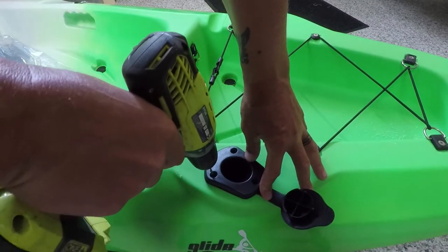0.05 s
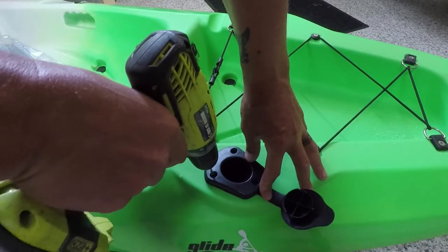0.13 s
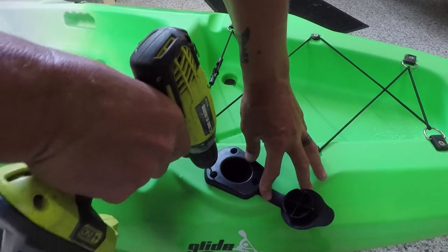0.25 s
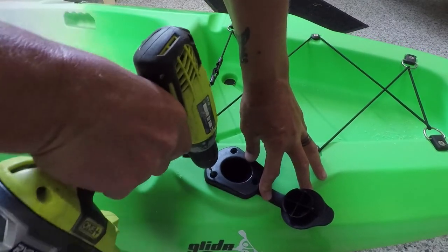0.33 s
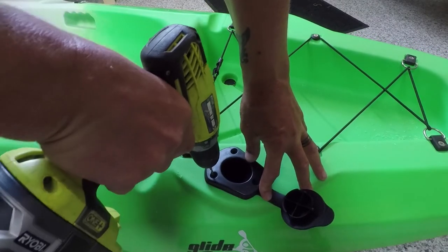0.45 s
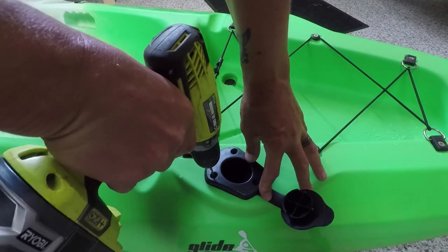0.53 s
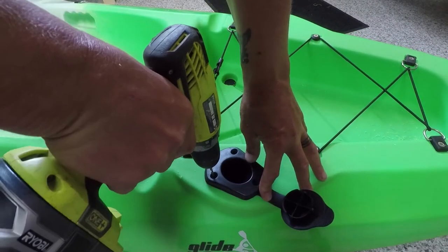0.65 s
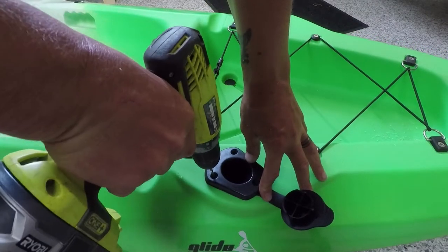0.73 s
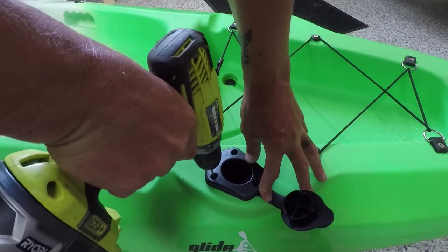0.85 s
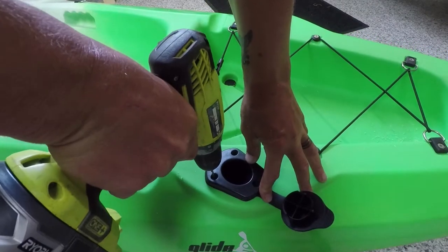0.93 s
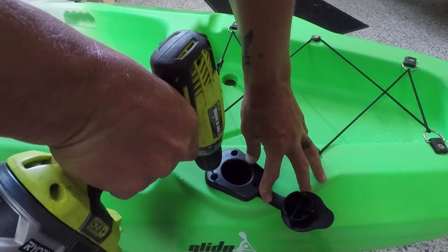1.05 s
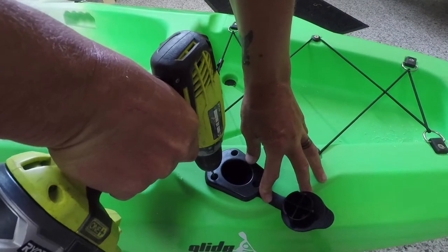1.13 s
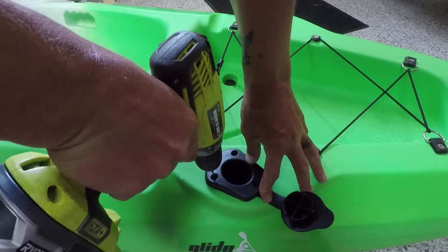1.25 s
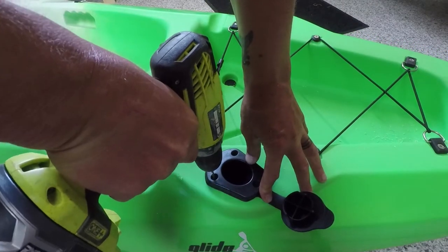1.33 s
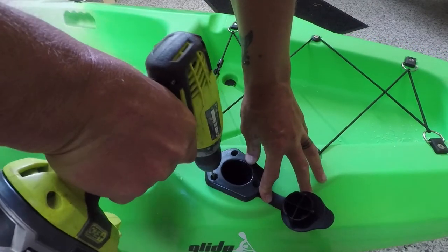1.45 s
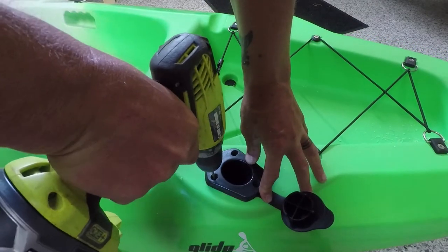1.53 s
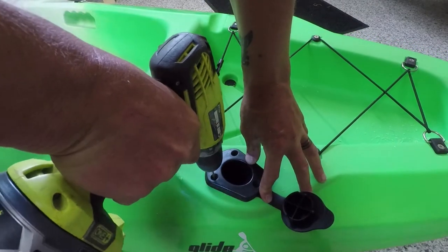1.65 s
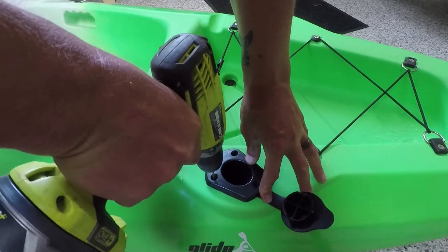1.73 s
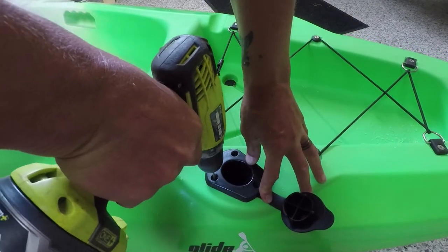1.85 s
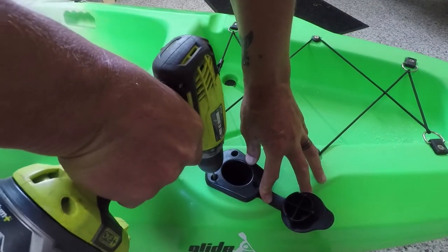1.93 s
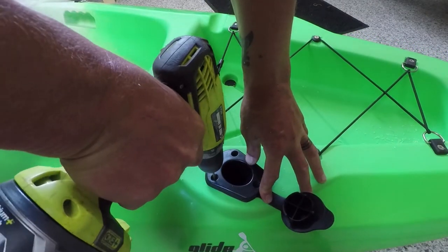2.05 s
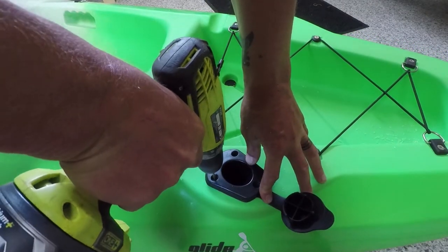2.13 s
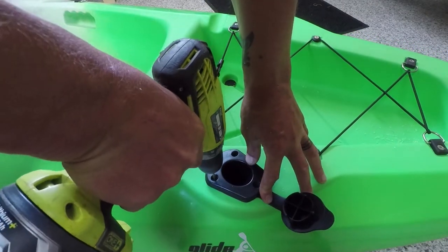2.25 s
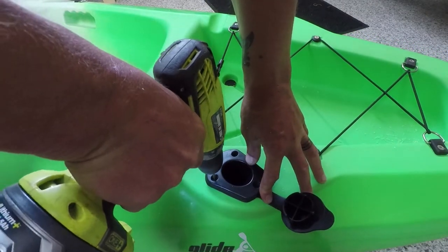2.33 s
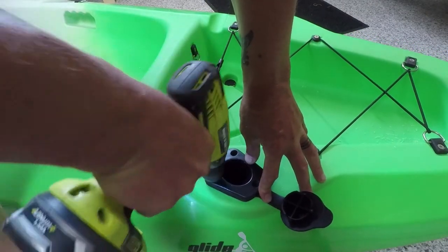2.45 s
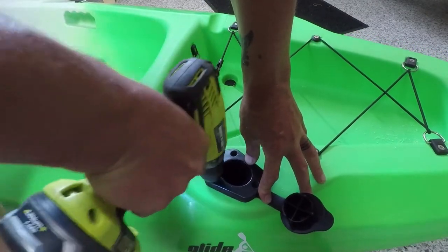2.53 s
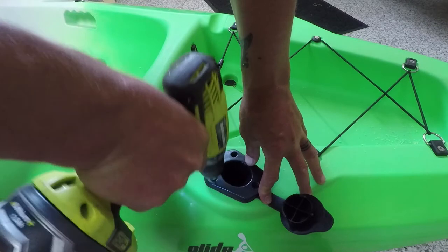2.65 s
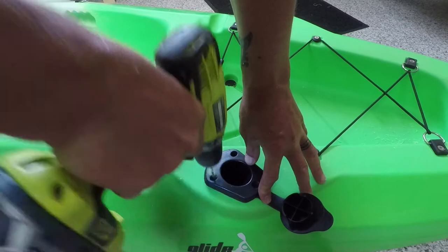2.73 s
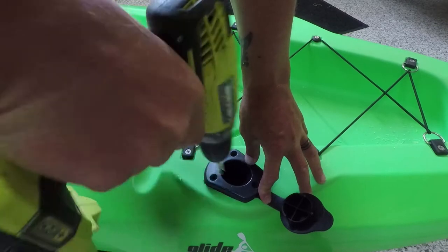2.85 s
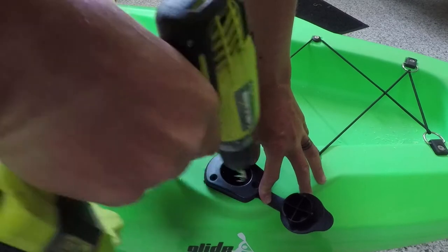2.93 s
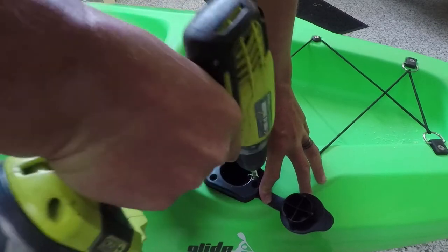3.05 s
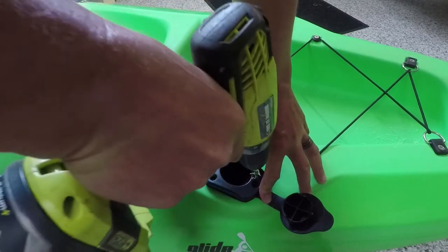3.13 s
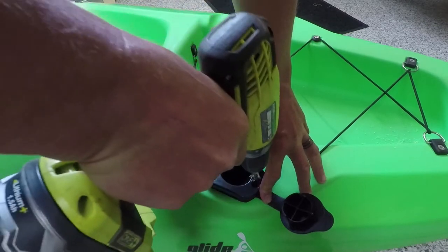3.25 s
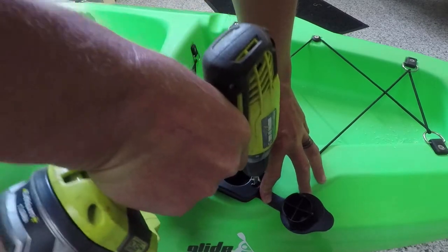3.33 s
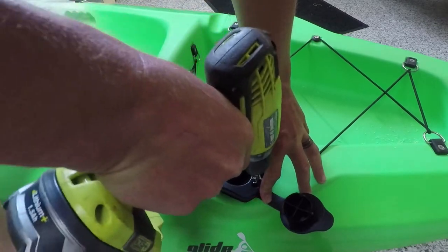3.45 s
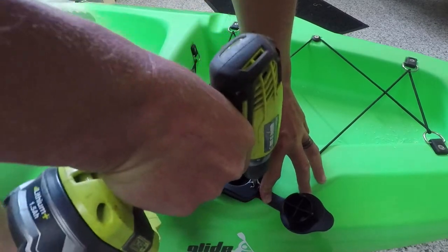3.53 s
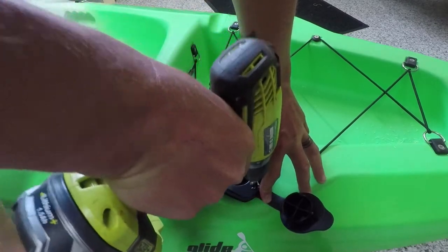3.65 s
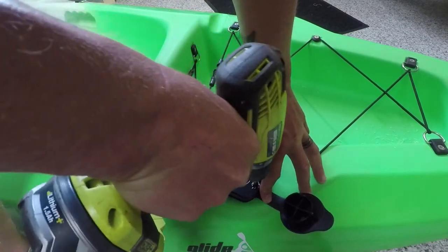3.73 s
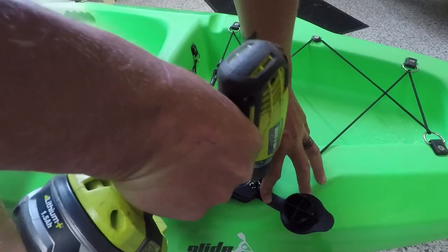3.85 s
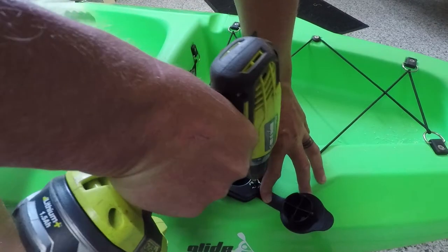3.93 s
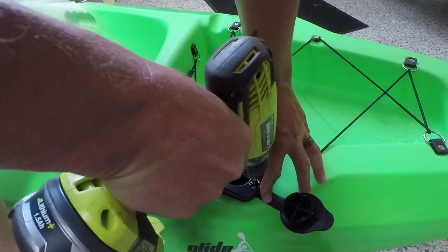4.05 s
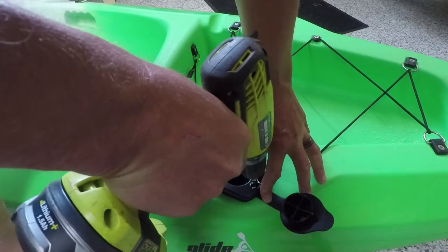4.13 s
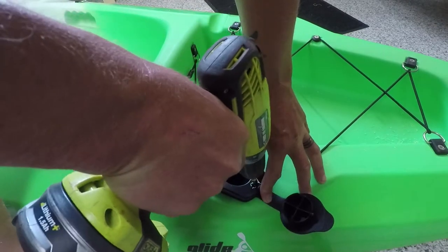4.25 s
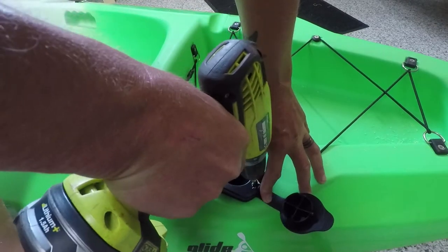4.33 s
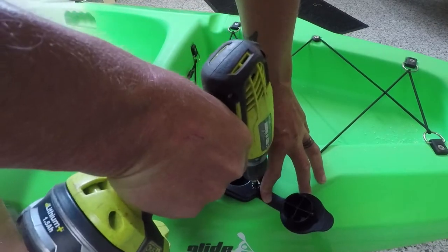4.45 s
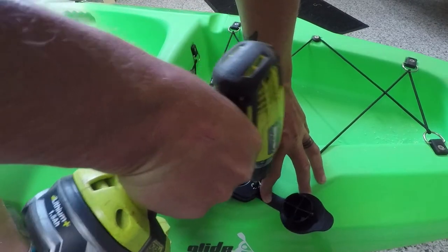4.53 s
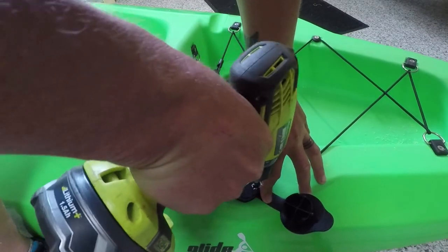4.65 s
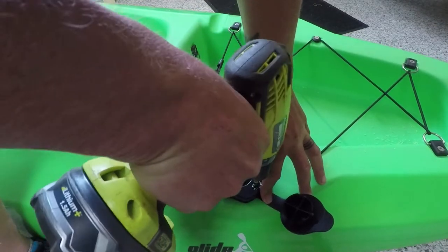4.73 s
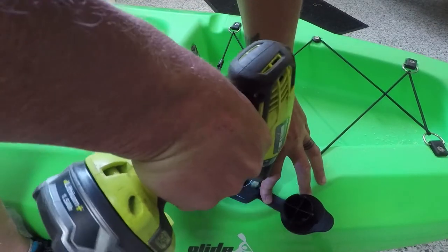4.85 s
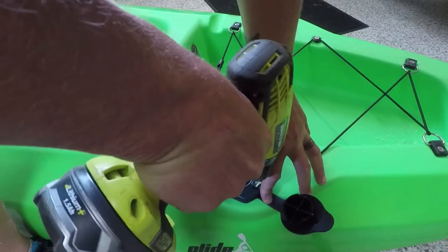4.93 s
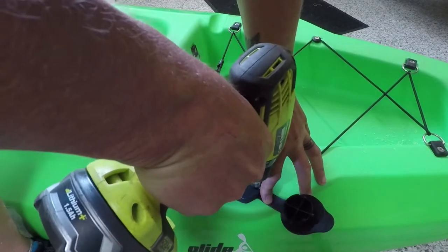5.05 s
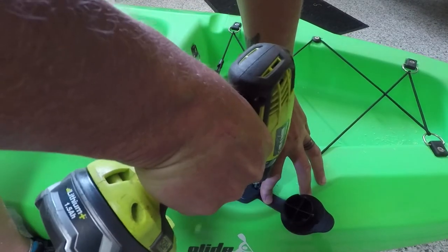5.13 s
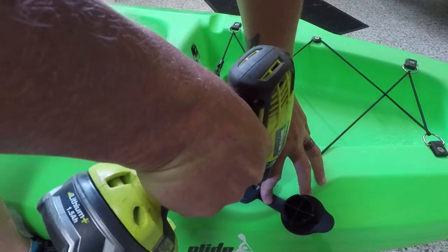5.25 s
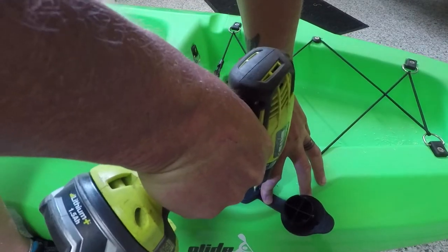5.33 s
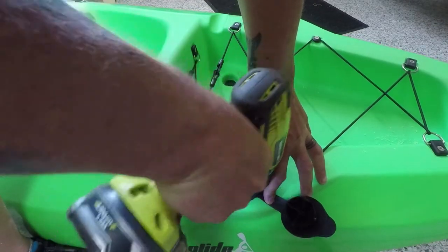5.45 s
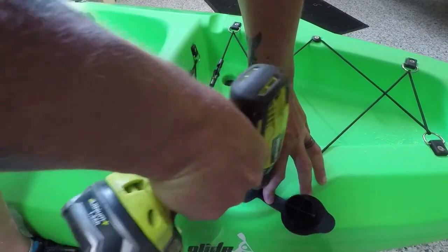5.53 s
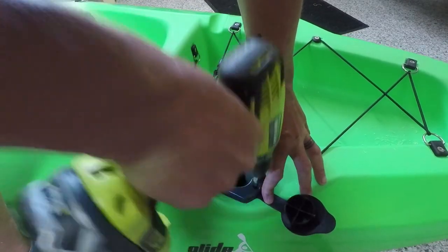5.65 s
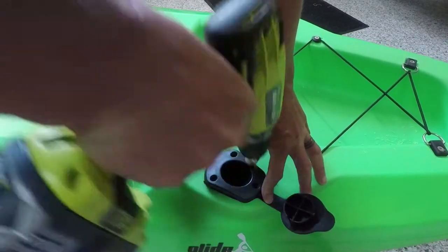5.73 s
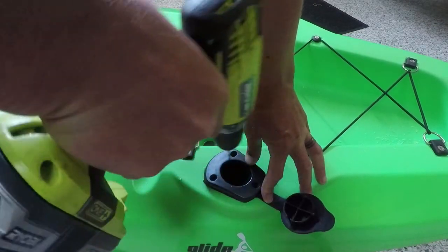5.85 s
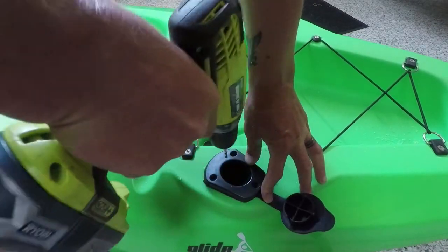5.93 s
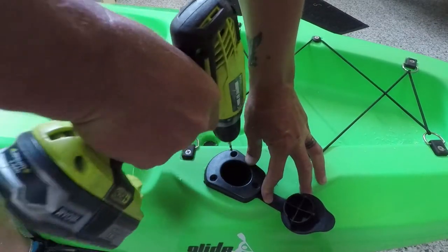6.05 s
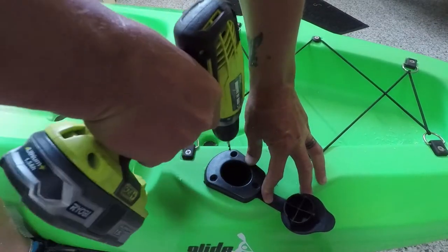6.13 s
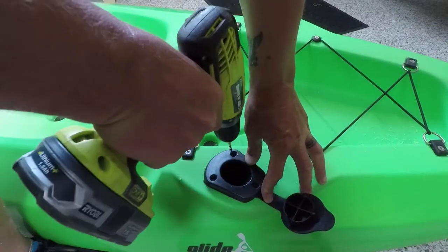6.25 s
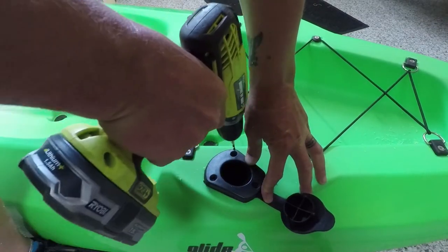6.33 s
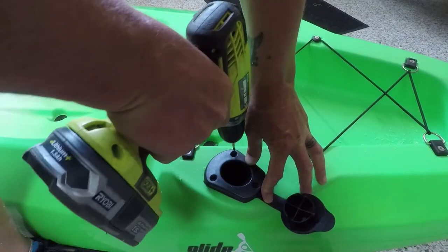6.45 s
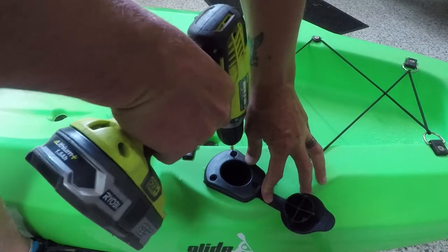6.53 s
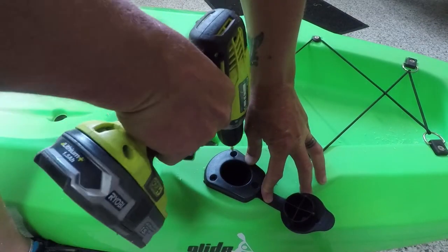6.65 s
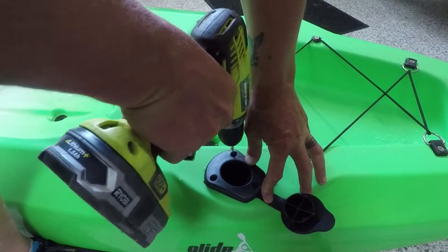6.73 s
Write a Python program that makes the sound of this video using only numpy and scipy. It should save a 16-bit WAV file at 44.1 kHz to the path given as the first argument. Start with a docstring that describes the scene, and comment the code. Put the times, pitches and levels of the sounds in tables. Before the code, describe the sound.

Very close in a garage, faint ticks and rubbing on plastic lead to a cordless drill spinning up with a clack. It whines and rasps for about a second, dips as it breaks through with a hollow rattling thud, then brakes with loud clacks. Soft slides and light taps follow for two seconds before a second, shorter run does the same. Afterwards come a dull hollow knock and small ticks over quiet air.

```python
"""Cordless drill boring a hollow hull

A cordless drill bores two holes through a fitting into a hollow plastic kayak, close by in a garage.
The trigger drives, coasts or brakes the motor, and shaft speed sets the gearbox rasp, tones and whine.
Random slips at the bit excite hull modes as it breaks through; chuck clacks are decaying noise impacts.
Around the holes the bit ticks on the fitting and knocks on the hull, and hand and bit slide on plastic.
Dense reflections form the garage, over steady air noise and two soft puffs of draught."""
import sys
import numpy as np
from scipy import signal
from scipy.fft import rfft, irfft
from scipy.io import wavfile

SR = 44100
rng = np.random.default_rng(int(sys.argv[2]) if len(sys.argv) > 2 else 0)


def output_pcm(signal):
    """Save a mono or channel-first signal as 16-bit PCM at the path in sys.argv[1].

    Samples are clipped to [-1, 1] before scaling.
    """
    pcm = np.clip(np.atleast_2d(signal).T, -1, 1) * 32767
    wavfile.write(sys.argv[1], SR, np.round(pcm).astype(np.int16))


N = 299439
TIME = np.arange(N) / SR  # s

# All levels are relative: the mixing gains in the functions also apply.
# Trigger moves (coast: let go; brake: released fully): start_s, action
TRIGGER = [(1.321, "pull"), (1.431, "coast"), (1.67, "pull"), (2.713, "coast"), (2.762, "brake"),
           (4.814, "pull"), (5.623, "coast"), (5.674, "brake")]
# Motor response to each action: goal as a share of full speed, time_constant_s
MOTOR_RESPONSE = {"pull": (1, .037), "coast": (0, .73), "brake": (-.25, .076)}
# Load on the bit, the same in every hole: time_s from the tip piercing, mesh_sag_hz at full speed
LOAD = [(-.5, 0), (-.09, 55), (0, 145), (.05, 95), (.11, 155), (.2, 80), (.36, 10)]
# Tones of motor, fan and gears: multiple of shaft speed, level_db
SHAFT_ORDERS = [(1, -21), (2, -21), (5, -17), (10, -16), (13, -15), (14, -28), (15, -19), (17, -18),
                (18, -26), (19, -17), (20, -16), (21, -21), (22, -17), (24, -18), (25, -15), (30, -21),
                (35, -25)]
# Gearbox rasp through its casing: pitch_hz, density_db per Hz
CASING_SPECTRUM = [(20, -22), (60, -16.5), (110, -10), (200, -16.5), (500, -13.5), (1100, -8), (1600, -3.5),
                   (2500, -2), (3100, -4.5), (4400, -3.5), (5600, -5.5), (7800, -5.5), (9300, -9),
                   (10800, -17.5), (13000, -13), (15500, -17.5)]
# Casing resonances: pitch_hz, width_hz, level_db
CASING_PEAKS = [(1735, 77, -7.5), (2490, 390, -5), (8626, 420, -4)]
# Gear whine at full speed: time_s, level_db
WHINE_LEVEL = [(1.75, -27.5), (2.2, -27.5), (2.7, -27.5), (4.95, -22.5), (5.3, -22), (5.45, -24.5)]
# Chuck lock slams: start_s, level_db, rebound_level_db
CLACKS = [(1.3275, -4, -7.5), (2.7689, -10, -14), (2.7761, -6.5, -8.5), (2.7888, 2.5, 0), (4.8163, -5, -20),
          (5.684, -5, -6), (5.701, 0.5, -0.5), (5.7195, -7.5, -1.1), (5.744, -13.5, -21.5)]
# Spectrum of a clack: pitch_hz, density_db per Hz
CLACK_SPECTRUM = [(120, -18), (500, -9), (1000, -7.5), (1550, 1.5), (2300, -0.5), (3200, -8), (4000, -3.5),
                  (5000, -12.5), (9000, -14.5), (11000, -29.5), (15500, -27)]
# Holes, where the tip pierces and the flutes then tear the wall: start_s, length_s, rumble_db, fade_db
HOLES = [(2.341, 0.26, -25.5, -2), (5.347, .3, -24, -10)]
# Spectrum of cutting, thuds and hull murmur: pitch_hz, density_db per Hz
CUT_SPECTRUM = [(20, -17.5), (50, -6), (103, 3.5), (193, -5.5), (238, -3), (274, -12), (347, 0),
                (472, -13.5), (528, -9), (769, -15), (921, -10), (1400, -21), (1820, -43), (3080, -120)]
# Mean modes of the hollow hull: pitch_hz, level_db, t60_s
HULL_MODES = [(106.9, -7, 0.22), (129, -11, 0.3), (147.6, 0, 0.3), (172, -1.5, 0.14), (235.1, -6.5, 0.25),
              (273, -4.5, 0.11), (349.7, -5.5, 0.14), (382, -4.5, 0.22), (441, -0.5, 0.06),
              (496, -10.5, 0.073), (870, -9, 0.16), (959, -18.5, 0.15)]
# Knocks or snags of the bit on the hull: start_s, level_db, hardness_db
KNOCKS = [(2.34, -29, -20), (2.416, -11, -4), (2.435, -19, -8.5), (2.565, -16, 3), (3.38, -30.5, -14),
          (3.659, -28.5, -34), (4.506, -29, -12.5), (5.346, -30, -9), (5.413, -15, 9), (5.459, -19, -3.5),
          (5.508, -17, 5), (6.178, -21, -5.5), (6.36, -31, -16), (6.476, -30.5, -12), (6.732, -33, -9.5)]
# Taps or snags of the bit tip on the fitting: start_s, level_db, sharpness_db
TICKS = [(0.08, -47, -4), (0.165, -39.5, -6), (0.437, -42, -4.5), (0.66, -35, -7.5), (0.692, -35, 8),
         (0.8, -41, 0), (0.959, -40, -7.5), (1.089, -42.5, -6.5), (1.165, -45.5, 2), (1.287, -37, 3),
         (2.361, -10.5, -6.5), (2.569, -13.5, -13.5), (3.381, -34, -7.5), (3.658, -31.5, -4),
         (4.11, -47, -12), (4.506, -40, -11.5), (4.636, -34, -1), (5.376, -11.5, -6), (6.178, -27.5, -9),
         (6.359, -42, -21.5), (6.472, -33.5, -13), (6.478, -26, -8), (6.578, -37, -3), (6.729, -37.5, -10)]
# Spectrum of a tick before its tilt: pitch_hz, density_db per Hz
TICK_SPECTRUM = [(350, -28), (600, -7.5), (736, -14), (1490, -3.5), (2950, -10), (3660, -14.5),
                 (7240, -19.5), (7960, -18.5), (11000, -31), (14500, -31.5), (15500, -49)]
# Hand and bit sliding on the plastic: start_s, length_s, murmur_db, scrape_db
RUBS = [(0.01, 0.05, -53, -76), (0.113, 0.16, -49, -66), (0.296, 0.33, -62.5, -62),
        (0.703, 0.15, -58, -61.5), (0.98, 0.16, -56, -79), (3.398, 0.27, -42.5, -60),
        (3.462, 0.035, -42, -52.5), (3.657, 0.29, -44.5, -57.5), (4.033, 0.081, -53.5, -73),
        (4.248, 0.0801, -62, -65), (4.554, 0.75, -52.5, -60.5), (6.19, 0.12, -36.5, -62.5),
        (6.496, 0.34, -45, -64)]
# Spectrum of the scrape: pitch_hz, density_db per Hz
SCRAPE_SPECTRUM = [(250, -19.5), (520, 3.5), (1100, -7), (2000, -7), (3500, -18), (6000, -19), (15000, -34)]
# Reverberation of the garage: pitch_hz, t60_s
GARAGE_DECAY = [(100, 0.72), (500, 0.97), (2000, 0.56), (5000, 0.65), (9000, 0.58), (15000, 0.51)]
# Spectrum of the steady air noise: pitch_hz, density_db per Hz
AIR_SPECTRUM = [(12, -28), (20, 8), (49, -13), (129, -8), (191, -19), (416, -21.5), (906, -25.5),
                (1500, -30), (1670, -27), (3080, -34.5), (14300, -40.5), (15500, -40)]
# Puffs of draught at the microphone: centre_s, half_length_s, level_db
PUFFS = [(0.402, 0.072, -32.5), (0.636, 0.065, -44)]
# Spectrum of the draught: pitch_hz, density_db per Hz
DRAUGHT_SPECTRUM = [(8, 28), (20, -12), (40, -30), (80, -42), (300, -77)]

TEETH, FULL_MESH_HZ = 12, 4185  # gear teeth; unloaded mesh tone at full speed
RASP_DB, STRAIN_DB = -21, -8.5  # rasp at full speed; its share from speeding up or braking
RASP_LAW, WHINE_LAW = 1.5, 1.3  # powers of speed
REBOUND_S = .004
CATCH_S, TIP_DB, CLEAR_S = 0.066, -13, .08  # delay of the flutes; quieter tip; fall as chips clear
RUB_FADE_DB, RUB_RELEASE_S = -6, 0.016
AIR_DB = -60.5
EDGE_HZ = 15650  # upper band limit


def drill(pulsing=.25, flutter_db=0.93, tones_db=-28):
    """Gear meshing: teeth rasp through the casing and sing at shaft multiples; returns body and whine."""
    speed = motor_speed()
    strain = abs(np.gradient(speed, TIME)) * MOTOR_RESPONSE["pull"][1]  # 1 at a standing start
    load_s, load_hz = np.transpose(LOAD)
    sag_hz = sum(np.interp(TIME - start, load_s, load_hz, left=0, right=0) for start, *_ in HOLES)
    shaft_hz = speed * (FULL_MESH_HZ - sag_hz) / TEETH * (1 + 0.00077 * wander(60))
    angle = 2 * np.pi * np.cumsum(shaft_hz) / SR
    effort = np.hypot(speed ** RASP_LAW, amp(STRAIN_DB) * strain)

    # brushes and teeth scrape hardest a few times in each turn
    beats = sum(np.cos(count * angle) for count in (2, 4, 6)) / 2
    rasp = grains(per_s=24000, spread_db=1.8)
    rasp *= (1 + pulsing * beats) * amp(flutter_db * wander(98))
    body = amp(RASP_DB) * effort * unit(colour(rasp, CASING_SPECTRUM, CASING_PEAKS))

    # tones depend less on effort than the rasp does, and die away when the shaft is slow
    turning = np.minimum(shaft_hz / 220, 1) ** 3
    singing = amp(tones_db) * np.sqrt(effort) * turning
    for order, level_db in SHAFT_ORDERS:
        # each tone swells as it glides through the ring of the gear housing
        swell_db = 10.5 / (1 + ((order * shaft_hz - 4850) / 380) ** 2)
        phase = order * (angle + .02 * wander(30)) + rng.uniform(-np.pi, np.pi)
        tone = np.sqrt(2) * np.sin(phase)
        body += amp(level_db + swell_db + 1.4 * wander(17)) * singing * tone

    # play in the gears makes the mesh tone waver in phase and level
    mesh = np.sqrt(2) * np.sin(TEETH * angle + .17 * wander(250)) * amp(wander(70))
    whine_gain = amp(np.interp(TIME, *np.transpose(WHINE_LEVEL)))
    whine = whine_gain * speed ** WHINE_LAW * turning * mesh
    return body, whine


def motor_speed():
    """First-order response: each trigger move starts an exponential approach; share of unloaded full speed."""
    speed = np.zeros(N)
    for start, action in TRIGGER:
        goal, lag = MOTOR_RESPONSE[action]
        after = TIME >= start
        approach = np.exp((start - TIME[after]) / lag)
        speed[after] = np.maximum(goal + (speed[after][0] - goal) * approach, 0)
    return speed


def chuck():
    """Impact and rebound: steel pins hit their stops as the motor starts and brakes."""
    out = np.zeros(N)
    for start, slam_db, rebound_db in CLACKS:
        for delay, level_db in (0, slam_db), (REBOUND_S, rebound_db):
            contact = impact(decay=0.0025, ring_db=-17, ring_decay=.006)
            clack = colour(contact, CLACK_SPECTRUM)
            add(out, start + delay, amp(level_db) * peak_one(clack))
    return out


def cutting(rumble_db=-2.0, ring_db=-8):
    """Stick-slip excitation: tearing chips shake the hull, lightly at the tip and hard at the flutes."""
    slips = grains(per_s=510, spread_db=3.5)
    rumble = unit(colour(slips, CUT_SPECTRUM))
    ringing = unit(signal.oaconvolve(slips, hull_ring(tilt_db=3))[:N])
    body = rumble + amp(ring_db) * ringing
    force = np.zeros(N)
    for start, length, level_db, fade_db in HOLES:
        tip = stroke(start, CATCH_S, 0, attack=.004, release=0.021)
        flutes = stroke(start + CATCH_S, length - CATCH_S, fade_db, attack=0.0096, release=CLEAR_S)
        force += amp(level_db + TIP_DB) * tip + amp(level_db) * flutes
    return amp(rumble_db) * unit(body) * force


def knocks(boom_db=-3, thud_db=-6):
    """Impulsive excitation of modes: each blow gives a dull thud and rings the hull."""
    out = np.zeros(N)
    for start, level_db, hardness in KNOCKS:
        tilt = np.clip(.6 * (hardness + 5), -8, 5)  # dB an octave
        thud = colour(impact(decay=0.0062, ring_db=-10.0, ring_decay=0.0042), CUT_SPECTRUM)
        add(out, start, amp(level_db + boom_db) * hull_ring(tilt))
        add(out, start, amp(level_db + thud_db + tilt / 2) * peak_one(thud))
    return out


def hull_ring(tilt_db=0):
    """Modal superposition: decaying sines form the boom; a harder blow tilts it up, in dB an octave."""
    t = np.arange(SR // 2) / SR
    ring = np.zeros(len(t))
    for hz, level_db, t60 in HULL_MODES:
        pitch = hz * (1 + 0.018 * rng.standard_normal())  # each ring draws slightly different mode pitches
        gain = amp(level_db + tilt_db * np.log2(hz / 200) - 60 * t / t60)
        ring += gain * np.sin(2 * np.pi * pitch * t + rng.uniform(-np.pi, np.pi))
    ring *= 1 - np.exp(-t / 0.001)  # the soft wall takes a moment to give
    return peak_one(ring)


def ticks(tick_db=-1.0, rise=0.00047):
    """Contact stiffness: plastic gives a little under steel; a sharper tap rises faster and is brighter."""
    out = np.zeros(N)
    for start, level_db, sharpness in TICKS:
        contact = impact(decay=.0018, ring_db=-6.5, ring_decay=0.0077)
        rise_s = rise * amp(-.6 * (sharpness + 5.0))
        contact *= 1 - np.exp(-TIME[:len(contact)] / rise_s)
        tick = colour(contact, TICK_SPECTRUM, tilt_db=0.57 * (sharpness + 8.5))
        add(out, start, amp(level_db + tick_db) * peak_one(tick))
    return out


def sliding(murmur_db=-3, scrape_db=1):
    """Stick-slip friction: light slips scrape the surface and murmur in the hull."""
    murmur = unit(colour(grains(per_s=280, spread_db=3.5), CUT_SPECTRUM))
    soft_hand = signal.butter(2, [70, 235], "bandpass", fs=SR, output="sos")
    murmur = unit(signal.sosfilt(soft_hand, murmur))
    slips = grains(per_s=1600, spread_db=4)
    scrape = unit(colour(slips, SCRAPE_SPECTRUM) * amp(2 * wander(25)))
    out = np.zeros(N)
    for start, length, low_db, high_db in RUBS:
        pressure = stroke(start, length, RUB_FADE_DB, attack=0.012, release=RUB_RELEASE_S)
        out += pressure * (amp(murmur_db + low_db) * murmur + amp(scrape_db + high_db) * scrape)
    return out


def garage(x, wet_db, early_db, count=3):
    """Room reverberation: close reflections, then tails whose decay time depends on frequency."""
    early = np.zeros(SR // 20)
    places = (rng.uniform(.003, .028, size=16) * SR).astype(int)
    early[places] = rng.choice([-1, 1], size=16)
    out = x + amp(early_db) * signal.oaconvolve(x, early / np.linalg.norm(early))[:N]
    for k in range(count):
        hz, t, bands = signal.stft(rng.standard_normal(SR), SR, nperseg=256)
        decay = amp(-60 * t / read(GARAGE_DECAY, hz)[:, None])
        tail = signal.istft(bands * decay, SR, nperseg=256)[1]
        tail *= 1 - np.exp(-TIME[:len(tail)] / 0.0014)
        # random tails fade in and out in turn, so the reverberation stays even in colour
        share = np.sqrt(2 / count) * np.cos(np.pi * (17 * TIME + k / count))
        out += amp(wet_db) * signal.oaconvolve(x * share, tail / np.linalg.norm(tail))[:N]
    return out


def air():
    """Broadband turbulence: steady coloured noise with two soft low puffs of draught."""
    steady = amp(AIR_DB) * unit(colour(rng.standard_normal(N), AIR_SPECTRUM))
    puff = unit(colour(rng.standard_normal(N), DRAUGHT_SPECTRUM, size=16384))
    gust = sum(amp(db) * np.exp(-((TIME - centre) / half) ** 2) for centre, half, db in PUFFS)
    return steady + puff * gust


def impact(decay, ring_db, ring_decay):
    """Transient contact: a decaying noise burst plus a brief buzz of the parts it shakes."""
    t = np.arange(SR // 8) / SR
    envelope = np.exp(-t / decay) + amp(ring_db) * np.exp(-t / ring_decay)
    return rng.standard_normal(len(t)) * envelope


def grains(per_s, spread_db):
    """Random impulse process: tiny impacts of uneven size and either sign, at rms 1."""
    size = amp(spread_db * np.minimum(rng.exponential(1, N), 4))
    return unit(size * rng.choice([-1, 1], N) * (rng.random(N) < per_s / SR))


def stroke(start, length, fade_db, attack, release):
    """Force envelope: a quick rise, a change of fade_db over the length, then a Gaussian fall."""
    early = np.maximum(start - TIME, 0)
    late = np.maximum(TIME - start - length, 0)
    fade = amp(fade_db * np.clip((TIME - start) / length, 0, 1))
    return fade * np.exp(-(early / attack) ** 2 - (late / release) ** 2)


def wander(hz):
    """Low-passed noise: a smooth random signal of rms 1 whose spectrum falls away above about hz."""
    lowpass = np.exp(-(np.fft.rfftfreq(N, 1 / SR) / hz) ** 2)
    return unit(irfft(rfft(rng.standard_normal(N)) * lowpass, N))


def colour(x, spectrum, peaks=(), tilt_db=0, size=4096):
    """Minimum-phase filtering: a causal filter from a spectrum, resonances and a tilt in dB an octave."""
    hz = abs(np.fft.fftfreq(size, 1 / SR))
    gain = amp(read(spectrum, hz) + tilt_db * np.log2(np.clip(hz, SR / 40, None)))
    for centre, width, db in peaks:
        gain = gain + amp(db) / (1 + (2 * (hz - centre) / width) ** 2)
    log_gain = np.log(np.maximum(gain / gain.max(), 1e-5))
    taps = np.fft.ifft(np.exp(np.conj(signal.hilbert(log_gain)))).real
    return signal.oaconvolve(x, taps[:size // 2])[:len(x)]


def read(points, hz):
    """Logarithmic interpolation: reads a table on a log-frequency axis."""
    f, value = np.transpose(points)
    return np.interp(np.log(hz + 1), np.log(f + 1), value)


def amp(db):
    """Decibel law: level to amplitude gain."""
    return 10 ** (np.asarray(db) / 20)


def unit(x):
    """Energy normalization: scales to rms 1."""
    return x / np.sqrt(np.mean(x ** 2) + 1e-20)


def peak_one(x):
    """Peak normalization: scales the largest excursion to 1."""
    return x / abs(x).max()


def add(mix, start, sound):
    """Superposition: adds a sound into the mix at a time in seconds."""
    part = mix[max(round(start * SR), 0):][:len(sound)]
    part += sound[:len(part)]


def scene():
    """Direct and reflected sound: the whine beams at the microphone, so its early reflections are weaker."""
    body, whine = drill()
    work = body + chuck() + cutting() + knocks() + ticks() + sliding()
    work_in_room = garage(work, wet_db=-20.5, early_db=-12.5)
    whine_in_room = garage(whine, wet_db=-20.5, early_db=-24.0)
    mono = work_in_room + whine_in_room + air()
    return np.array([mono, mono])  # both channels alike


def record(dry):
    """Clipping and band limiting: peaks flatten at 0.92 of full scale, then a low-pass filter follows."""
    held = np.clip(dry, -.92, .92)
    lowpass = signal.firwin(511, EDGE_HZ, window=("kaiser", 9), fs=SR)
    return signal.oaconvolve(held, lowpass[None], "same")


dry = scene()
out = record(dry)
output_pcm(out)
```